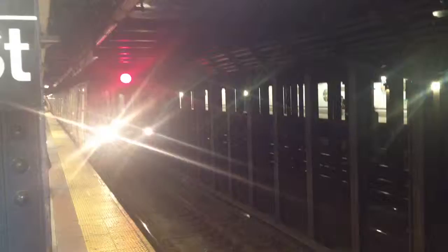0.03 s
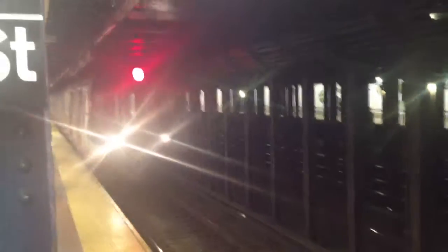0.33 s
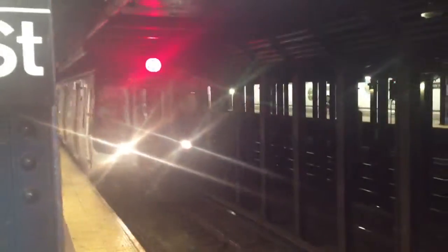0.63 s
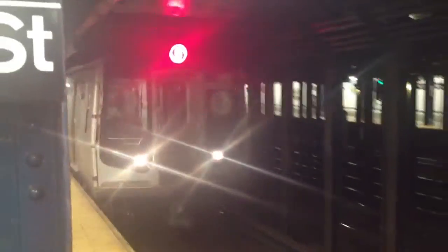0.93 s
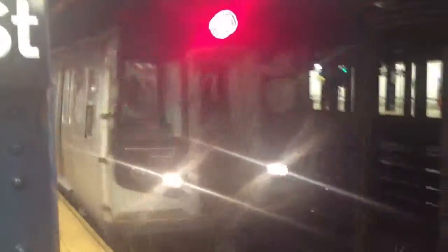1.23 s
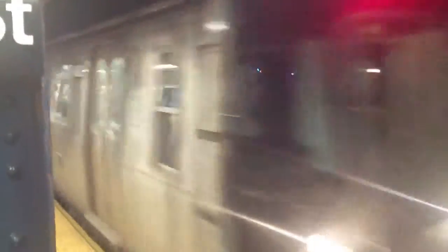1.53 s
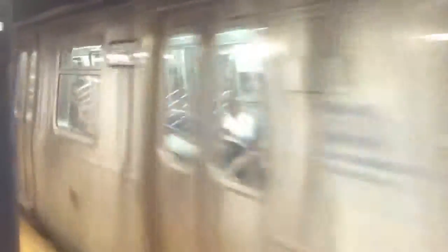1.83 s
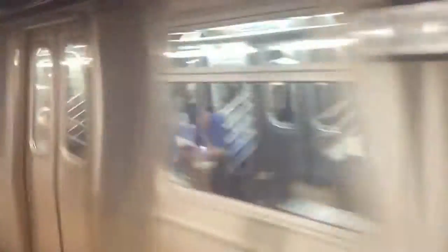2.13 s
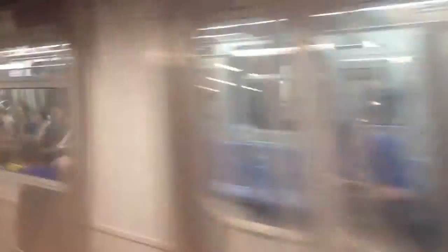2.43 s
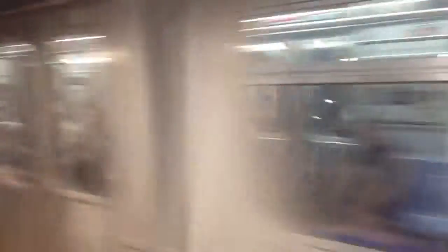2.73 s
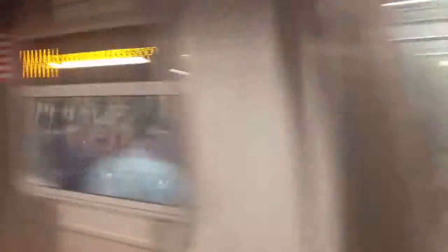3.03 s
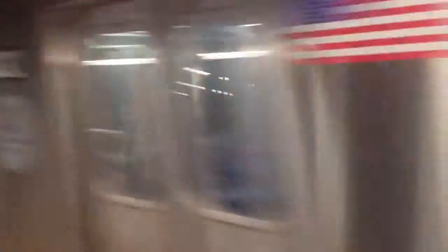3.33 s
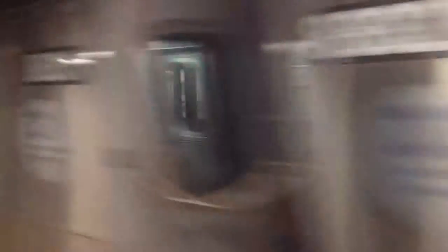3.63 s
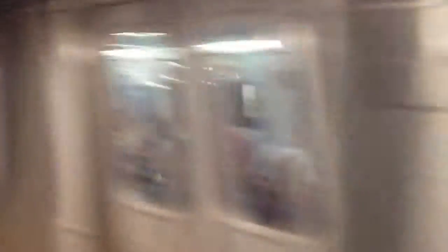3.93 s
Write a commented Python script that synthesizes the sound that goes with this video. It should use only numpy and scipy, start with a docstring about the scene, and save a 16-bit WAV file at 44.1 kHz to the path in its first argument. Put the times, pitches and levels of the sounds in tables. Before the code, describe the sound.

A subway train rumbles into the station and roars past, wheels clacking and whining.

```python
"""Rumble and roar of wheels on rough rail: a subway train rolls into an underground station
and passes an arm's length from the platform edge. Axles clack over joints; the tunnel smears each blow.
Rubbing flanges make the rails sing ahead of the train. A gear whine sinks.
A shrill whine swells, dips at two loud clacks, and is loudest near the end."""
import sys
import numpy as np
from scipy import signal
from scipy.fft import rfft, irfft
from scipy.io import wavfile
from scipy.ndimage import uniform_filter1d, minimum_filter1d

SR = 44100
rng = np.random.default_rng(int(sys.argv[2]) if len(sys.argv) > 2 else 0)


def bounce(signal):
    """Save signal as a 16-bit WAV file at the path given by the first command-line argument."""
    frames = np.transpose(np.atleast_2d(signal))
    limited = np.clip(frames, -1, 1)
    pcm = np.round(limited * 32767).astype(np.int16)
    wavfile.write(sys.argv[1], SR, pcm)


N = 176400

# rolling noise spectrum: f/Hz, ahead level/dB, alongside level/dB
ROLL_SPECTRUM = [(25, -39, -47), (75.5, -35.5, -33), (114, -15, -14), (169.6, -0.5, -1.5), (263, 0, -3),
                 (350, 1, 1.5), (450, -3, -0.5), (528, -4.5, -5.5), (796, -8, -8.5), (1100, -13, -13),
                 (1610, -14, -14.5), (2180, -14.5, -16.5), (2540, -18.5, -16), (3360, -14.5, -16.5),
                 (3720, -14.5, -14), (4770, -17, -16.5), (5280, -26.5, -26), (5600, -23.5, -22.5),
                 (8200, -24.5, -26.5), (9530, -34.5, -36.5), (15000, -46.5, -41)]
# centres of rumble, roar, hiss, top: f/Hz
ROLL_BANDS_HZ = [260, 1200, 6500, 12000]
# rolling noise gain: t/s, then level/dB of rumble, roar, hiss, top
ROLL_LEVELS = [(.12, -3.5, -0.5, -2, -0.5), (.4, 1, -1, -0.5, -3), (.75, 1.5, -1, 2, 3),
               (1.0, 2, 2, 3.5, -2), (1.36, 2.5, 3.5, 1.5, 4), (1.57, -2, -1, -4.5, -4),
               (1.8, -1, -1, -1.5, -1.5), (2.1, -1, -2, -1.5, -4.5), (2.4, -4, -1, -1.5, -5),
               (2.6, -3, 2.5, 3, 4.5), (2.85, -0.5, 5, 2, -3), (3.05, 3.5, 2, 0.5, -0.5), (3.3, 2, 2, 1, 2),
               (3.55, 3.5, 4, 4, 7), (3.75, 3.5, 5.5, 6, 10), (4.0, 0.5, 7, 9, 14)]
# joint strikes: t/s, attack/s, then level/dB of thud, bang, clang, ring, crack
STRIKES = [(.668, 0.0059, -25, -22, -24, -8, -9), (0.778, 0.015, 2, 0.5, -4, -8, -22),
           (.985, 0.018, -15, -4, -9, -26, -16), (1.404, 0.0012, -11, 4, -1.5, -4, -5),
           (1.609, 0.0023, -1, 0, -1, -9.5, -3), (2.426, 0.0039, 1.5, 2, 2.5, 6, 2),
           (2.555, 0.01, -10, -13, -17, -9, -8), (2.652, 0.0033, -7, -7, 0, 2.5, -0.5),
           (3.054, 0.016, 2, 0, -4.5, -13, -20), (3.365, 0.011, 0, 0, -4, -8, -11),
           (3.61, 0.0098, -6, -0.5, -2, -14, -14), (3.98, .004, -12, -10, -10, 1, 0)]
# clack spectrum: f/Hz, level/dB
CLACK_SPECTRUM = [(30, -52), (80, -46), (170, -1.5), (400, 2.5), (900, -2.5), (1500, -6), (2500, -6.5),
                  (3300, -6.5), (4000, -4.5), (4800, -6.5), (5400, -16), (6500, -11), (8200, -13.5),
                  (9500, -22.5), (15000, -21.5)]
# centres of thud, bang, clang, ring, crack: f/Hz
CLACK_BANDS_HZ = [260, 800, 2200, 6000, 12000]
# decay of each clack band: T60/s
CLACK_DECAYS_S = [0.5, 0.41, 0.57, 0.48, 0.21]
# modes of struck wheel and rail: f/Hz, level/dB
WHEEL_MODES = [(570, -0.5), (860, 0.5), (1060, -3.5), (2320, -9), (4080, -4.5), (4480, -3), (4900, -9),
               (6400, -10), (7700, -10), (9690, -22)]
# shrill whine: t/s, f/Hz, core level/dB
SHRILL_TRACK = [(.12, 2880, -40.5), (.6, 2880, -33.5), (.95, 2920, -32), (1.35, 2950, -30),
                (1.55, 2900, -36.5), (1.8, 2880, -33.5), (2.35, 2880, -30.5), (2.6, 2880, -39),
                (3.05, 2870, -41.5), (3.2, 2865, -33), (3.33, 2860, -23.5), (3.44, 2860, -26.5),
                (3.7, 2855, -25), (3.9, 2850, -20), (4.0, 2850, -25.5)]
# gear whine: t/s, f/Hz, core level/dB
GEAR_TRACK = [(.12, 1490, -36), (.38, 1464, -33), (.7, 1442, -36.5), (1.05, 1400, -32), (1.5, 1349, -40.5),
              (1.85, 1314, -34), (2.15, 1285, -43), (2.45, 1230, -46)]
# high rail modes: f/Hz
RAIL_MODES_HZ = [4070, 6050, 6860, 7740, 8780, 9690, 10200, 13500, 14400]
# per rail mode: width/Hz
RAIL_WIDTHS_HZ = [300, 340, 280, 300, 260, 200, 340, 600, 700]
# per rail mode: relative level/dB
RAIL_LEVELS_DB = [-2, -4, -3, -6, -11, -15, -9.5, -12, -13]
# gain of the rail singing: t/s, level/dB
SINGING_LEVEL = [(.12, -55), (.5, -46), (.95, -51), (1.12, -41), (1.42, -38), (1.6, -53), (2.3, -57),
                 (2.75, -56), (2.92, -49), (3.15, -54), (4.0, -54)]
# flange chirps: peak t/s, 1/e half-length/s, level/dB
FLANGE_CHIRPS = [(0.545, 0.036, -33), (0.85, .06, -26.5)]


def rolling():
    """Wheels on rough rail; the spectrum shifts as the train draws level."""
    arrival_s, crossfade_s = 1.5, 0.66
    level_db, flicker_db, swell_db = -20, 1.4, 0.14
    near = np.clip((np.arange(N) / SR - arrival_s) / crossfade_s + .5, 0, 1)
    rush, spectra = contact(), np.array(ROLL_SPECTRUM)
    ahead, alongside = colour(rush, spectra[:, [0, 1]]), colour(rush, spectra[:, [0, 2]])
    roll = (1 - near) * ahead + near * alongside
    narrow_bands = split(roll, np.geomspace(60, 15000, 14))
    roll = sum(band * undb(flicker_db * walk(rate_hz=11)) for band in narrow_bands)
    wide_bands = split(roll, ROLL_BANDS_HZ)
    roll = sum(band * undb(curve(ROLL_LEVELS, k + 1)) for k, band in enumerate(wide_bands))
    return roll * undb(level_db + swell_db * walk(rate_hz=12))


def contact(grit_per_s=1300, grit_share=0.22, spread_db=2.5):
    """Steel on rough steel: a dense rush with small impacts in it."""
    rush = rng.standard_normal(N)
    hits = rng.random(N) < grit_per_s / SR
    sizes = undb(spread_db * np.minimum(rng.exponential(size=N), 4))
    grit = unit(hits * sizes * rng.choice([-1, 1], N))
    return np.sqrt(1 - grit_share) * rush + np.sqrt(grit_share) * grit


def clacks(crash_db=-14.5, ring_db=-28.5):
    """Each joint strike shakes the bogie, top band dying first, and leaves wheel and rail ringing."""
    bands = split(colour(contact(), CLACK_SPECTRUM), CLACK_BANDS_HZ)
    crash = sum(band * strike_envelope(k, CLACK_DECAYS_S[k]) for k, band in enumerate(bands))
    ring = np.zeros(N)
    for hz, db in WHEEL_MODES:
        nearest_band = np.argmin(np.abs(np.log(np.array(CLACK_BANDS_HZ) / hz)))
        ring += tone(hz, width_hz=110) * undb(db) * strike_envelope(nearest_band, t60_s=0.72)
    return crash * undb(crash_db) + ring * undb(ring_db)


def strike_envelope(band_index, t60_s, hold_s=0.026):
    """All strikes in one band: attack, short hold between near walls, decay in the tunnel."""
    t, power = np.arange(N) / SR, np.zeros(N)
    for start_s, attack_s, *levels_db in STRIKES:
        rise = np.clip((t - start_s) / attack_s, 0, 1)
        fall = np.exp(-np.log(1000) * np.maximum(t - start_s - hold_s, 0) / t60_s)
        power += (undb(levels_db[band_index]) * rise * fall) ** 2
    return np.sqrt(power)


def whine(track, core_width_hz, skirt_width_hz, skirt_db):
    """A narrow core with a rough skirt, following a pitch and level track."""
    hz, level_db = curve(track, 1), curve(track, 2)
    core = tone(hz, core_width_hz)
    skirt = tone(hz, skirt_width_hz) * undb(skirt_db)
    return (core + skirt) * undb(level_db)


def rail_singing(glint_db=3, glint_hz=19):
    """Rubbing flanges make the rail's high modes glint in turn."""
    modes = zip(RAIL_MODES_HZ, RAIL_WIDTHS_HZ, RAIL_LEVELS_DB)
    singing = sum(tone(hz, width_hz) * undb(db + glint_db * walk(glint_hz)) for hz, width_hz, db in modes)
    return singing * undb(curve(SINGING_LEVEL, 1))


def flange_chirps(centre_hz=4020, rise_hz_per_s=2000):
    """Flanges rub short rising chirps near the lowest singing mode."""
    t, chirps = np.arange(N) / SR, np.zeros(N)
    for peak_s, half_s, db in FLANGE_CHIRPS:
        hz = centre_hz + rise_hz_per_s * np.clip(t - peak_s, -half_s, half_s)
        envelope = np.exp(-((t - peak_s) / half_s) ** 2)
        chirps += tone(hz, width_hz=290) * undb(db) * envelope
    return chirps


def tone(hz, width_hz):
    """A tone blurred into a narrow band by many reflections; rms 1."""
    phase = 2 * np.pi * np.cumsum(hz * np.ones(N)) / SR
    return unit(walk(width_hz / 2) * np.cos(phase) + walk(width_hz / 2) * np.sin(phase))


def walk(rate_hz):
    """Smooth random drift; rms 1."""
    hz = np.arange(N // 2 + 1) * SR / N
    return unit(irfft(rfft(rng.standard_normal(N)) * np.exp(-(hz / rate_hz) ** 2), N))


def colour(x, spectrum):
    """Filter by rows of f/Hz, level/dB; rms 1."""
    hz, db = np.array(spectrum).T
    gain = undb(np.interp(log_hz(), np.log(hz), db))
    return unit(irfft(rfft(x) * gain, N))


def split(x, centres_hz):
    """Overlapping bands that sum to x."""
    spectrum = rfft(x)
    weights = [np.interp(log_hz(), np.log(centres_hz), row) for row in np.eye(len(centres_hz))]
    return [irfft(spectrum * weight, N) for weight in weights]


def log_hz():
    """Log frequency of each FFT bin."""
    return np.log(np.maximum(np.arange(N // 2 + 1) * SR / N, 1))


def curve(table, column):
    """One table column, linearly interpolated in time."""
    rows = np.array(table)
    return np.interp(np.arange(N) / SR, rows[:, 0], rows[:, column])


def undb(db):
    """Decibels to gain."""
    return 10 ** (np.asarray(db) / 20)


def unit(x):
    """Scale to rms 1."""
    return x / np.sqrt(np.mean(x ** 2))


def scene():
    """The train from the platform, mono."""
    wheels = rolling() + clacks()
    gear = whine(GEAR_TRACK, core_width_hz=42, skirt_width_hz=150, skirt_db=-1.5)
    shrill = whine(SHRILL_TRACK, core_width_hz=150, skirt_width_hz=344, skirt_db=-2.5)
    return (wheels + shrill + gear + rail_singing() + flange_chirps())[None, :]


def record(dry, start_s=.12, ceiling=.75, cutoff_hz=15250):
    """Brief opening silence, fast peak limiter, steep low-pass."""
    gate = np.arange(N) / SR >= start_s
    gain = ceiling / np.maximum(np.abs(dry), ceiling)
    smooth_gain = uniform_filter1d(minimum_filter1d(gain, size=129), size=129)
    lowpass = signal.ellip(14, .2, 90, cutoff_hz, fs=SR, output="sos")
    return signal.sosfilt(lowpass, dry * smooth_gain * gate)


dry = scene()
out = record(dry)
bounce(out)
```